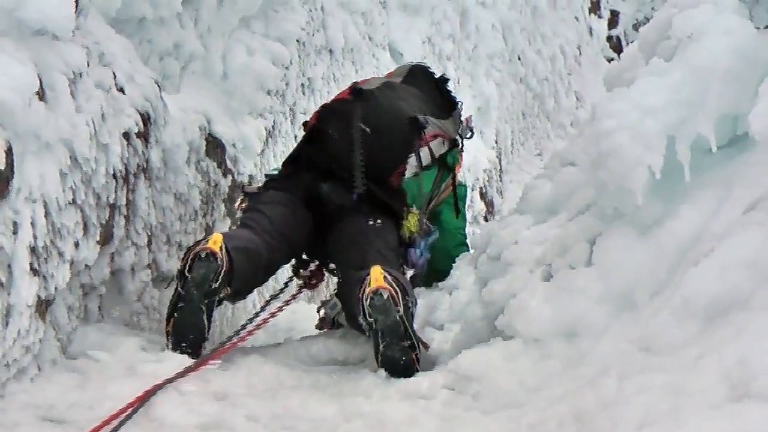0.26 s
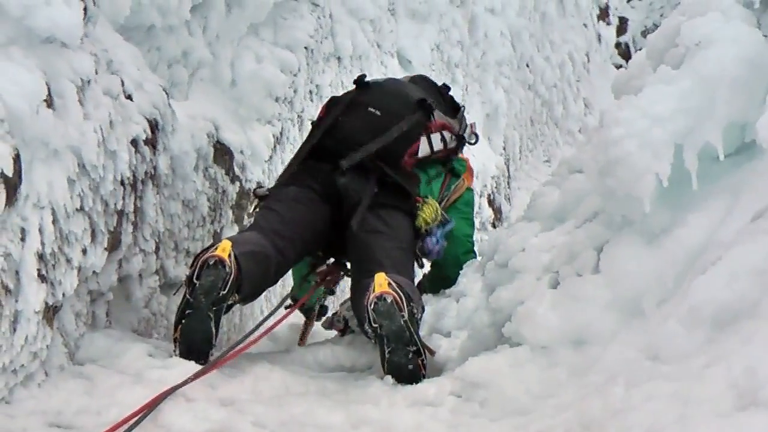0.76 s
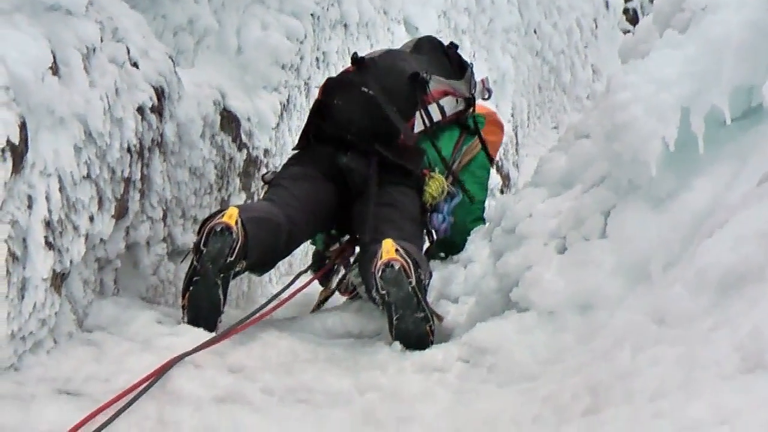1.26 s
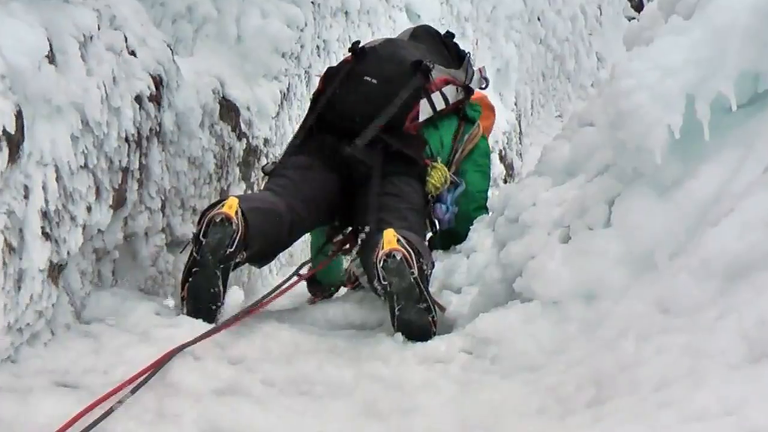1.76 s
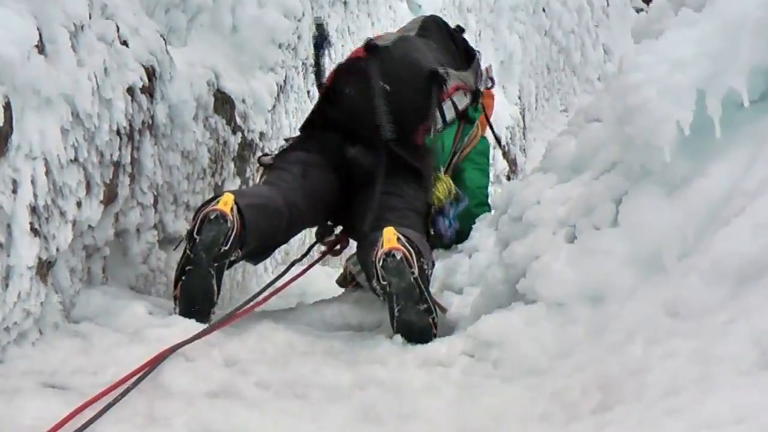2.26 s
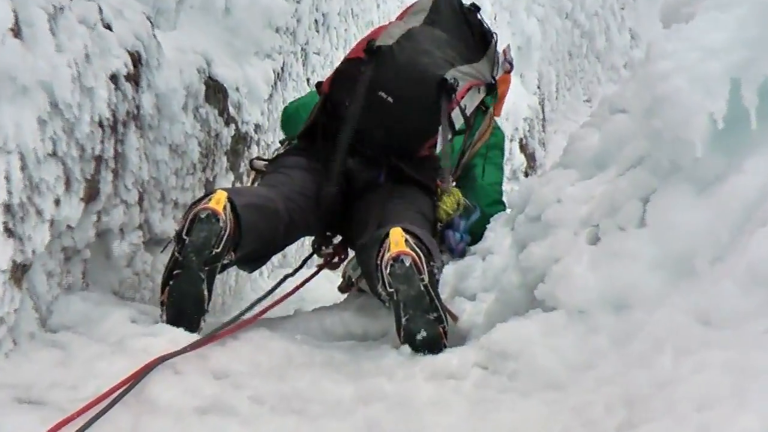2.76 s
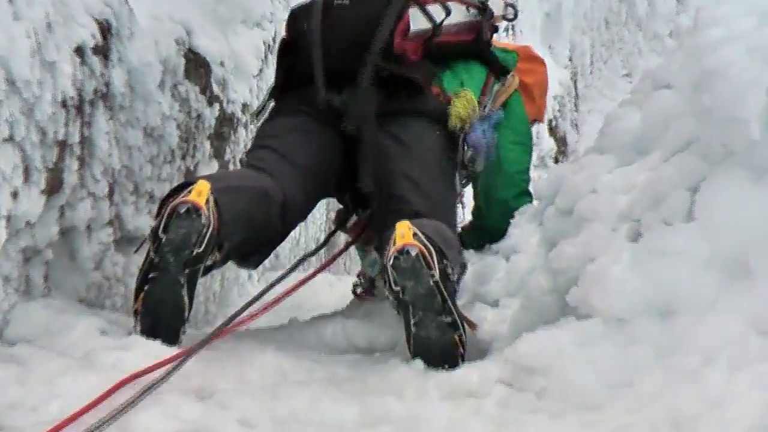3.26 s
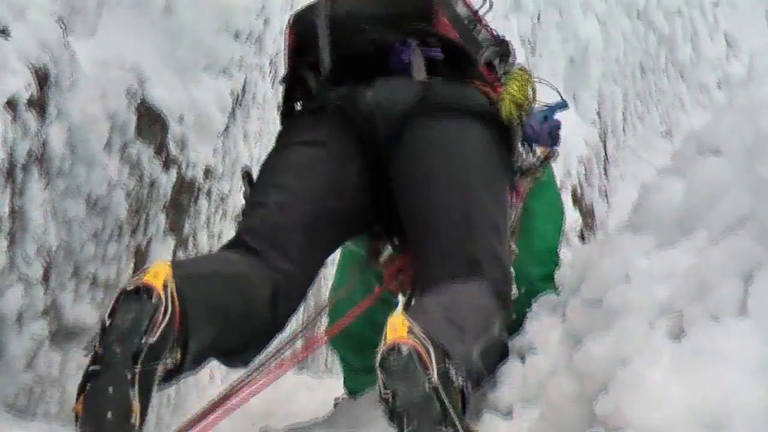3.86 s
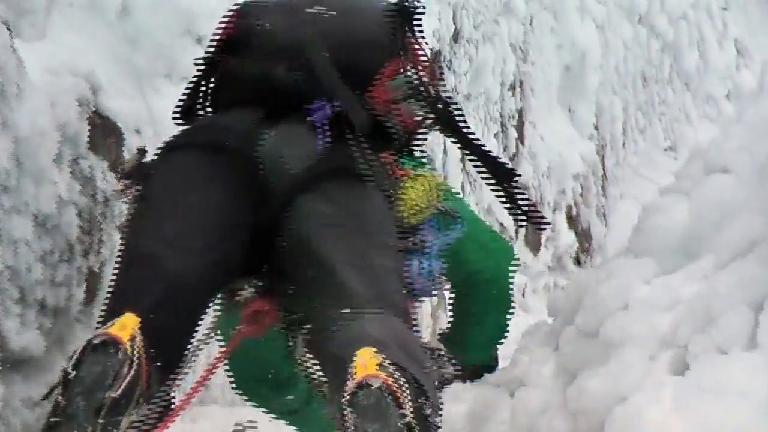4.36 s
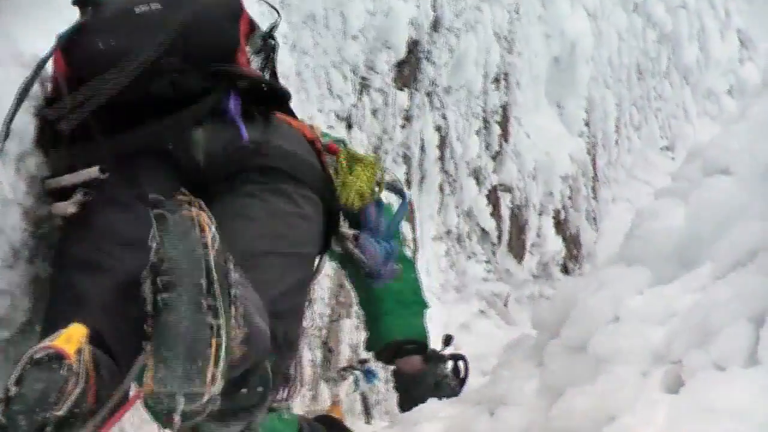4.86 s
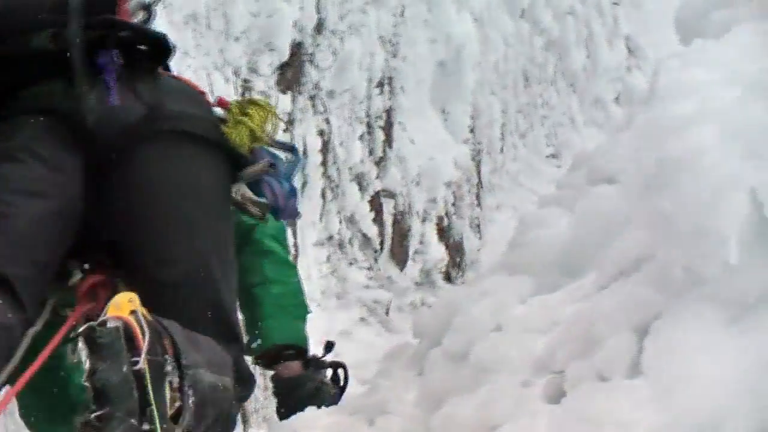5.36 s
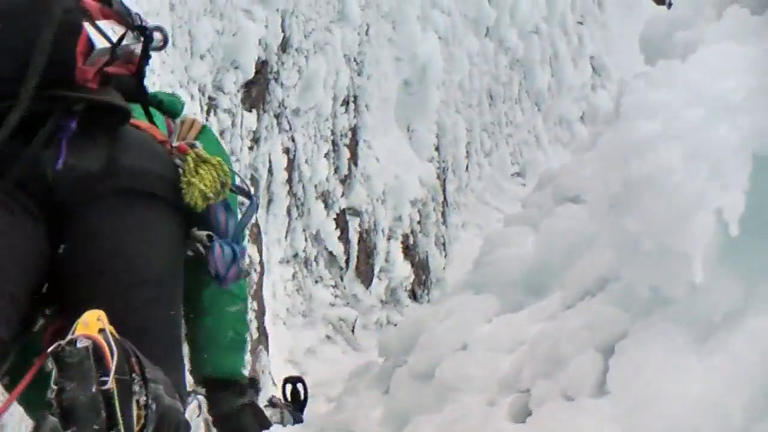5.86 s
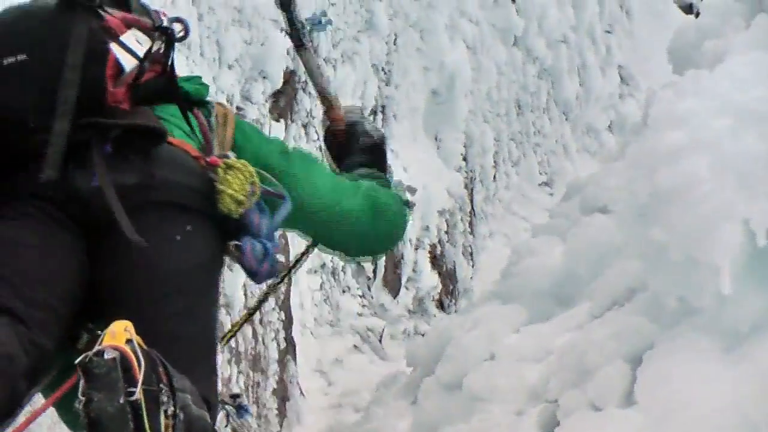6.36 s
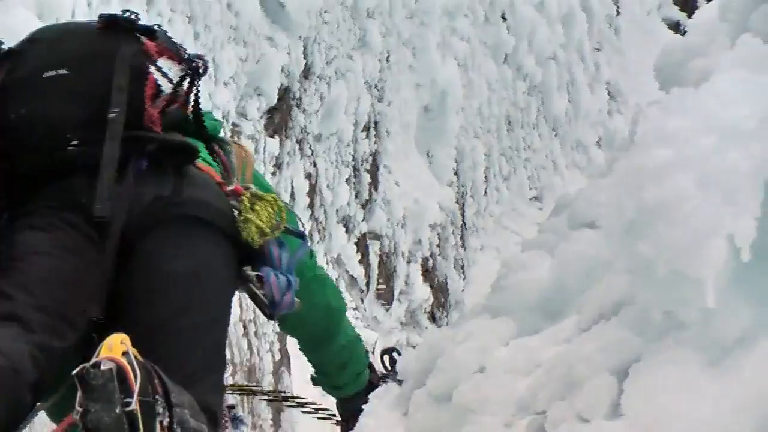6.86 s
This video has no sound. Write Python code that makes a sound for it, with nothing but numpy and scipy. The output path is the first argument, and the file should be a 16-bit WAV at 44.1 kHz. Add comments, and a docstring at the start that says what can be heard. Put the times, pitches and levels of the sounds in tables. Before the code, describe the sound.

Crampons and an ice axe bite snow and ice in irregular snaps and thumps, with small metallic clinks and trickling crumbs.

```python
"""A frozen gully, where a climber moves up on crampons and ice axes, close by.
Points crack the ice: a snap, splintering noise and a short ring. Boots thud (damped, gritty swings)
and crunch (bursts of tiny random fractures), and the metal gear clinks and jangles (dying tones).
Rubbing, trickling snow and ice crumbs follow the climber's effort, over a faint hush of filtered
noise with one puff of wind. Short echoes return from the walls, and the blows drift leftwards."""
import sys
import numpy as np
from scipy import signal
from scipy.fft import rfft, irfft
from scipy.io import wavfile

SR = 44100
rng = np.random.default_rng(int(sys.argv[2]) if len(sys.argv) > 2 else 0)


def file_out(sig):
    """Save sig as 16-bit WAV at sys.argv[1]."""
    # one column per channel
    cols = np.atleast_2d(sig).T
    # limit, then scale
    lim = np.clip(cols, -1, 1)
    pcm = np.round(lim * 32767).astype(np.int16)
    wavfile.write(sys.argv[1], SR, pcm)


N = 313551  # length in samples

# Levels of single sounds hold before the echoes and the stereo placing.
# low hush of the gully, drawn as a spectrum: pitch_hz, level_db
HUSH_SPECTRUM = [(20, -32), (45, -8), (72, -2), (100, -5.5), (200, -5.5), (500, -18), (1500, -25),
                 (6000, -36)]
# how hard the climber moves; rubbing, trickling and jangling follow it: time_s, effort_db
EFFORT_CURVE = [(0.0, -47.5), (0.51, -40.5), (0.77, -49), (1.74, -53.5), (2.02, -55), (3.21, -48),
                (3.34, -47), (4.08, -46.5), (4.57, -42.5), (4.87, -46.5), (5.27, -43), (5.47, -43),
                (5.88, -46), (6.52, -45), (6.67, -47.5), (6.75, -44), (6.95, -44.5), (7.11, -46)]
# a boot drags over the snow: middle_s, half_length_s, level_db
BOOT_DRAGS = [(.42, .11, -44), (4.35, 0.09, -44.5), (5.427, 0.091, -41.5)]
# colour of the rubbing: pitch_hz, level_db
RUB_SPECTRUM = [(59, -50), (100, -7), (195, -2), (356, -5), (394, -5), (456, -8.5), (505, -5), (566, -4.5),
                (1500, -13.5), (1950, -45), (3300, -120)]
# colour of the trickling grains: pitch_hz, level_db
TRICKLE_SPECTRUM = [(400, 12), (900, 6), (1800, 7), (3200, 8), (4500, 0.5), (5600, 4), (6800, -12),
                    (10000, -37)]
# colour of the fine powder: pitch_hz, level_db
POWDER_SPECTRUM = [(3000, -72), (6000, -28), (7500, 1.5), (9500, 11), (10800, 10.5), (12000, 1),
                   (13800, 11), (15000, -26), (16000, -12)]
# what the metal gear rings with: pitch_multiple (no unit), level_db, decay_s
GEAR_MODES = [(.79, -15, 0.0034), (0.918, -5.5, 0.0065), (1., -2.5, 0.0043), (1.089, -2.5, 0.0041),
              (1.352, -11, 0.0092), (2.12, -13, 0.0044), (3.15, -13, 0.0071)]
# pieces of gear knocking together, plus one bright ringing zip at 3.19 s: start_s, peak_level_db, pitch_hz
GEAR_CLINKS = [(.36, -27.5, 4270), (2.336, -38, 4270), (2.3682, -29, 4070), (2.4194, -34, 4270),
               (3.19, -26, 7700), (3.858, -23, 4260), (3.87, -27, 4500), (4.1454, -28.5, 4090),
               (4.456, -29, 4210), (4.483, -27, 3350), (4.5105, -17, 3890), (4.552, -34, 3820),
               (4.605, -29, 3400), (5.166, -20.5, 4230), (5.2306, -24.5, 4500), (5.473, -26.5, 3820),
               (7.033, -29, 4030)]
# snow crushed or showering: start_s, level_db (average over three lengths), length_s, grain_pitch_hz
SNOW_CRUNCHES = [(.438, -40, .02, 900), (0.494, -39, .022, 850), (2.898, -36.5, 0.026, 1050),
                 (2.959, -50, .025, 950), (3.182, -42, 0.025, 2300), (4.327, -35.5, 0.021, 1510),
                 (4.533, -45, 0.018, 900), (4.56, -46, 0.029, 845), (4.598, -38.5, 0.029, 6000),
                 (4.634, -37, 0.011, 5440), (4.752, -39, 0.019, 1700), (4.878, -45, 0.037, 940),
                 (5.011, -45, 0.077, 1440), (5.088, -36.5, 0.018, 1260), (5.116, -43, .05, 1570),
                 (5.242, -33, 0.016, 1650), (5.249, -35.5, 0.013, 1130), (5.34, -46, 0.039, 1470),
                 (5.503, -42, 0.011, 2080), (6.52, -43.5, 0.0039, 600), (6.615, -35, 0.012, 1440),
                 (6.643, -44, 0.046, 1410), (6.723, -39.5, 0.0086, 1420), (6.855, -43, 0.0096, 1580),
                 (6.876, -34, 0.011, 1880)]
# dull blows in packed snow: start_s, level_db, pitch_hz
SNOW_THUDS = [(0.3393, -15, 506), (.348, -25, 600), (0.454, -29.5, 173), (0.516, -30, 167),
              (.566, -38, 417), (1.132, -36.5, 330), (1.2564, -29, 594), (1.415, -33.5, 400),
              (1.648, -28.5, 277), (1.798, -41, 1090), (1.934, -35, 676), (2.004, -40.5, 950),
              (2.7275, -20.5, 196), (2.8959, -16.5, 510), (2.9035, -12.5, 240), (3.136, -26, 256.5),
              (3.189, -24, 510), (3.1955, -24, 174), (3.669, -31.5, 400), (4.339, -18.5, 365),
              (4.343, -27, 180), (4.394, -32, 400), (4.585, -28, 220), (4.686, -31, 330),
              (4.8806, -22.5, 520), (4.922, -26, 228), (5.012, -25.5, 479), (5.097, -20.5, 620),
              (5.253, -12.5, 211), (5.263, -13, 385), (5.274, -13, 213), (5.347, -20.5, 298),
              (5.388, -29, 340), (5.4468, -20.5, 375), (5.507, -21.5, 300), (6.047, -24.5, 890),
              (6.2202, -17, 860), (6.387, -34, 710), (6.5258, -21.5, 320), (6.6332, -22, 575),
              (6.644, -18.5, 744), (6.843, -26.5, 446)]
# what a chip of ice rings with: multiple_of_low_edge (no unit), level_db, decay_s
ICE_MODES = [(1.04, 7.5, 0.004), (1.48, 5, 0.0035), (2.1, 9, 0.0029), (2.65, 5, 0.00085)]
# points cracking the ice: start_s, level_db (average over 50 ms), low_edge_hz, high_edge_hz,
# tick_db (the part of the blow that skips the high edge)
ICE_CRACKS = [(.073, -37, 1530, 2200, -19.5), (0.39, -45, 597, 2750, -6), (0.3976, -42.5, 660, 3040, -25),
              (.4263, -39, 470, 1540, -24), (0.5661, -41.5, 326, 1880, -36),
              (0.597, -32.5, 1546, 3800, -19.5), (1.0346, -48.5, 280, 2310, -38),
              (1.072, -52.5, 280, 1000, -11), (1.1354, -36, 270, 4070, -21),
              (1.2412, -42.5, 900, 1200, -13), (1.2662, -46, 278, 5130, -27),
              (1.327, -32.5, 1073, 7200, -9.5), (1.4146, -46, 283, 1660, -19),
              (1.5408, -44.5, 384, 5170, -15), (1.5681, -28.5, 1232, 3730, -16.5),
              (1.629, -42, 546, 3480, -23), (1.6594, -38, 388, 9600, -35), (1.781, -44.5, 1300, 4500, -16),
              (1.971, -42, 1890, 4100, -12), (2.068, -47.5, 750, 8750, -26),
              (2.1085, -42.5, 2030, 5600, -9), (2.221, -49, 520, 1130, -9), (2.2986, -46, 345, 6660, -13),
              (2.3351, -44, 314, 8800, -25), (2.7285, -34, 294, 3530, -22), (2.7923, -49, 2620, 3240, -22),
              (2.8853, -51.5, 584, 3680, -18), (2.9069, -33, 280, 3470, -21),
              (2.931, -33.5, 2420, 3250, -19), (3.3186, -46.5, 476, 4360, -30),
              (3.3293, -46, 278, 2540, -32), (3.4339, -42, 3500, 4330, -37), (3.4728, -40, 2650, 3850, -11),
              (3.48, -45, 2500, 9000, -10), (3.566, -47, 280, 3000, -13), (3.9102, -46, 313, 1230, -37),
              (3.9515, -50.5, 310, 6910, -20), (3.9913, -44.5, 278, 10100, -36),
              (4.0108, -48, 550, 5240, -5), (4.0334, -46.5, 274, 12000, -25), (4.071, -45, 1470, 3000, -23),
              (4.6827, -41.5, 270, 1370, -23), (5.0122, -27, 390, 4850, -15),
              (5.047, -39.5, 690, 3480, -25), (5.2737, -27.5, 278, 1450, -30),
              (5.9482, -25.5, 1138, 4870, -17), (6.048, -29.5, 520, 2500, -49),
              (6.094, -45, 980, 2270, -38), (6.148, -39, 1470, 4530, -21), (6.1614, -43, 392, 3980, -18),
              (6.1858, -27.5, 2550, 3070, -26), (6.2178, -29.5, 700, 3620, -25),
              (6.39, -41.5, 444, 1580, -22), (6.4546, -38.5, 497, 12900, -39),
              (6.4718, -41.5, 1500, 7000, -13), (6.5518, -30.5, 1520, 2840, -21),
              (6.5895, -45.5, 493, 5750, 0), (6.6194, -38.5, 480, 3040, -34),
              (6.633, -27.5, 430, 3520, -16.5), (6.764, -44.5, 278, 4360, -12),
              (6.7798, -40.5, 282, 2300, -20), (6.842, -32.5, 330, 2520, -24), (6.878, -40.5, 282, 4830, 7),
              (6.9265, -42.5, 477, 2090, -11.5)]
# how far left and right differ at each pitch: pitch_hz, side_level_db
SIDE_SPECTRUM = [(60, -33.5), (300, -15), (1500, -49), (3000, -45.5), (5000, -13.5), (7000, -4),
                 (9000, -4.5), (11500, -26), (15000, -9)]

# one puff of wind: peak time and level, then how fast it swells and dies away
GUST_S, GUST_DB, GUST_RISE_DB_PER_S, GUST_FALL_DB_PER_S = 6.83, -43.5, 65, 56
USUAL_EFFORT_DB = -46  # at this effort the following layers have their plain level
# the gear swings more during the high step: middle, half length, extra level
STEP_S, STEP_HALF_S, STEP_SWING_DB = 4.5, .9, 8.5
# stray flakes: level against the climber's effort, and the range of their low edges
FLAKE_DB, FLAKE_LOW_HZ, FLAKE_HIGH_HZ = -5.5, 300, 2200
GRAIN_RANGE = 2.86  # crunching grains sound from this factor below their pitch to this factor above
# a thud at THUD_HZ has decay THUD_S; deeper ones move more snow and last longer
THUD_S, THUD_HZ, DEEP_LINGER = 0.0037, 400, 0.14
# splintering has decay SPLINTER_S for a firm blow; weaker blows crumble a little longer
SPLINTER_S, FIRM_DB, CRUMBLE_PER_DB = .002, -27, .008
# the climber drifts leftwards: left minus right at the start, and its growth
LEFT_DB, LEFT_DB_PER_S = .6, .3
TOP_HZ = 15300  # upper limit of the whole sound


def amp(db):
    """Turns decibels into a plain multiplier."""
    return 10 ** (np.asarray(db) / 20)


def unit(x):
    """Scales a sound to an average (rms) level of one."""
    return x / np.sqrt(np.mean(x ** 2) + 1e-20)


def add(mix, start_s, sound):
    """Adds a sound into the mix at its start time, cut off at the end of the mix."""
    part = mix[max(round(start_s * SR), 0):][:len(sound)]
    part += sound[:len(part)]


def clock():
    """Time of every sample in seconds."""
    return np.arange(N) / SR


def swell(middle_s, half_s):
    """A smooth rise and fall around one moment."""
    return np.exp(-((clock() - middle_s) / half_s) ** 2)


def effort(follow):
    """Loudness of a layer that follows the climber's effort by so many dB per dB."""
    effort_db = np.interp(clock(), *np.transpose(EFFORT_CURVE))
    return amp(follow * (effort_db - USUAL_EFFORT_DB))


def colour(x, points):
    """Filters by a spectrum drawn between points on a logarithmic pitch axis."""
    hz, db = np.transpose(points)
    f = np.fft.rfftfreq(len(x), 1 / SR)
    gain = amp(np.interp(np.log(f + 1), np.log(hz), db))
    return irfft(rfft(x) * gain, len(x))


def edge(x, hz, kind, order):
    """Removes what lies above ("low") or below ("high") a pitch, without looking ahead in time."""
    safe_hz = np.clip(hz, 20, .45 * SR)
    return signal.sosfilt(signal.butter(order, safe_hz, kind, fs=SR, output="sos"), x)


def ring(t, hz, modes, scatter):
    """A struck piece rings with several dying tones, a little different at every blow."""
    detune = 1 + scatter * rng.uniform(-1.06, 1, len(modes))
    sound = np.zeros(len(t))
    for (multiple, db, decay_s), shift in zip(modes, detune):
        tone = np.sin(2 * np.pi * min(hz * multiple * shift, SR / 2) * t)
        sound += rng.choice([-1, 1]) * amp(db) * np.exp(-t / decay_s) * tone
    return sound


def grains(count, per_s, spread_db):
    """Tiny fractures at random moments, mostly small and a few large."""
    out = np.zeros(count)
    at = np.flatnonzero(rng.random(count) < per_s / SR)
    chance, sign = rng.random((len(at), 2)).T
    size = np.minimum(-np.log(1 - chance), 4)
    out[at] = np.sign(sign - .5) * amp(spread_db * size)
    return out


def air(hush_db=-60, buffet_db=4, buffet_hz=14):
    """Moving air is filtered noise: a low steady hush and one deep, lumpy puff of wind."""
    puff = edge(edge(rng.standard_normal(N), 103, "low", order=3), 55, "high", order=2)
    puff *= amp(buffet_db * unit(edge(rng.standard_normal(N), buffet_hz, "low", order=2)))
    since = clock() - GUST_S
    gust = amp(GUST_DB + np.minimum(GUST_RISE_DB_PER_S * since, -GUST_FALL_DB_PER_S * since))
    hush = unit(colour(rng.standard_normal(N), HUSH_SPECTRUM))
    return amp(hush_db) * hush + gust * unit(puff)


def crystals(per_s=200, cycles=2, spread_db=4.5):
    """Snow grains of many sizes break; each gives a blip a few cycles long at its own pitch."""
    out = np.zeros(N)
    for hz in np.geomspace(450, 14500, 22):
        r, turn = np.exp(-hz / (cycles * SR)), 2 * np.pi * hz / SR
        resonance = [1, -2 * r * np.cos(turn), r * r]
        blips = signal.lfilter([1, 0, -1], resonance, grains(N, per_s, spread_db))
        out += np.sqrt(hz) * unit(blips)
    return unit(out)


def loose_snow(rub_db=-51.0, trickle_db=-50.0, powder_db=-55.5,
               rub_follow=.65, trickle_follow=1.14, powder_follow=0.93):
    """Rubbing, trickling grains and powder are noise and blips that arrive in shared little clumps."""
    clumps = amp(2.4 * unit(edge(rng.standard_normal(N), 40, "low", order=2)))
    rub = unit(colour(clumps * rng.standard_normal(N), RUB_SPECTRUM))
    crackle = clumps * (crystals() + .5 * rng.standard_normal(N))  # the finest grains merge into hiss
    trickle = unit(colour(crackle, TRICKLE_SPECTRUM))
    powder = unit(colour(crackle, POWDER_SPECTRUM))
    dragging = sum(amp(db) * swell(middle_s, half_s) for middle_s, half_s, db in BOOT_DRAGS)
    rub_level = np.hypot(amp(rub_db) * effort(rub_follow), dragging)
    return (rub_level * rub
            + amp(trickle_db) * effort(trickle_follow) * trickle
            + amp(powder_db) * effort(powder_follow) * powder)


def crumbs(level_db=-55, per_s=8, follow=0.53):
    """Small crumbs of ice patter on the slope: short noise taps, each size in its own pitch band."""
    out, t = np.zeros(N), np.arange(SR // 50) / SR
    for hz in np.geomspace(600, 5000, 12):
        tap = rng.standard_normal(len(t)) * np.exp(-t / .0018)
        tap = unit(edge(edge(tap, hz, "high", order=2), 2 * hz, "low", order=2))
        out += signal.oaconvolve(grains(N, per_s, spread_db=8.5), tap)[:N]
    return amp(level_db) * effort(follow) * unit(out)


def jangle(level_db=-59, follow=0.23, per_s=22, damping=0.57):
    """Gear brushes lightly as the harness sways; pieces lying together ring only briefly."""
    t = np.arange(SR // 40) / SR
    modes = [(multiple, db, damping * decay_s) for multiple, db, decay_s in GEAR_MODES]
    pieces = np.zeros(N)
    for hz in np.geomspace(3500, 4900, 10):
        touches = grains(N, per_s, spread_db=5.5)
        pieces += signal.oaconvolve(touches, ring(t, hz, modes, scatter=0.0446))[:N]
    level = amp(level_db + STEP_SWING_DB * swell(STEP_S, STEP_HALF_S))
    return level * effort(follow) * unit(pieces)


def chip(db, low_hz, high_hz, tick_db, ring_db=-4, body_db=-31, snap_db=-4, rise_share=.09):
    """A snap and fast-dying splintering; the size of the piece sets its band and its ring."""
    t = np.arange(SR // 20) / SR
    decay_s = SPLINTER_S * np.exp(CRUMBLE_PER_DB * (FIRM_DB - db))
    shape = np.exp(-t / decay_s) * (1 - np.exp(-t / (rise_share * decay_s)))
    splinters = unit(rng.standard_normal(len(t)) * shape)
    force = splinters + amp(snap_db) * unit(1. * (t == 0))  # the snap is a single-sample click
    crack = edge(force, high_hz, "low", order=4) + amp(tick_db) * force
    body = edge(crack, 240, "high", order=2)
    crack = unit(edge(crack, low_hz, "high", order=3) + amp(body_db) * body)
    hardness = low_hz / (low_hz + 400)  # small hard pieces ring, big snowy ones hardly do
    tone = hardness * amp(ring_db) * unit(ring(t, low_hz, ICE_MODES, scatter=0.055))
    return amp(db) * unit(crack + tone)


def flakes(count=24, spread_db=2, width=3, tick_db=-20):
    """Faint stray flakes break off by chance, one per equal slice of time, louder with more effort."""
    out = np.zeros(N)
    for k, (when, size, strength) in enumerate(rng.random((count, 3))):
        start_s = (k + when) / count * N / SR
        hz = FLAKE_LOW_HZ * (FLAKE_HIGH_HZ / FLAKE_LOW_HZ) ** size
        effort_db = np.interp(start_s, *np.transpose(EFFORT_CURVE))
        db = effort_db + FLAKE_DB + spread_db * (2 * strength - 1)
        add(out, start_s, chip(db, hz, width * hz, tick_db))
    return out


def clinks(tick_db=-12, tick_s=.0035):
    """Metal clips and screws touch with a tick and a ring; slings and cloth damp them quickly."""
    out, t = np.zeros(N), np.arange(SR // 8) / SR
    for start_s, db, hz in GEAR_CLINKS:
        tick = edge(rng.standard_normal(len(t)) * np.exp(-t / tick_s), 2400, "high", order=2)
        sound = ring(t, hz, GEAR_MODES, scatter=0.024) + amp(tick_db) * tick
        add(out, start_s, amp(db) * sound / abs(sound).max())
    return out


def crunches(fizz_db=-20, body_db=-17, lumpy_db=3.5):
    """A clump of breaking snow crystals swells fast and crumbles away in fits."""
    out = np.zeros(N)
    for start_s, db, length_s, hz in SNOW_CRUNCHES:
        u = np.arange(int(3 * length_s * SR)) / (length_s * SR)  # time counted in lengths
        fits = amp(lumpy_db * unit(edge(rng.standard_normal(len(u)), 145, "low", order=2)))
        shape = u ** 0.32 * np.exp(-(u / 0.8) ** 2)
        burst = fits * grains(len(u), per_s=2400, spread_db=1.0) * shape
        burst = edge(burst, hz * GRAIN_RANGE, "low", order=3) + amp(fizz_db) * burst
        body = edge(burst, 310, "high", order=2)
        burst = edge(burst, hz / GRAIN_RANGE, "high", order=2) + amp(body_db) * body
        add(out, start_s, amp(db) * unit(burst))
    return out


def thuds(rise_s=0.0005, cut_hz=105):
    """Packed snow gives way: a heavily damped, gritty swing that slows as the snow yields."""
    out, t = np.zeros(N), np.arange(SR // 10) / SR
    for start_s, db, hz in SNOW_THUDS:
        decay_s = THUD_S * (THUD_HZ / hz) ** DEEP_LINGER
        grit = edge(rng.standard_normal(len(t)), 2 * hz, "low", order=2)
        grit = unit(edge(grit, hz / 2, "high", order=2))
        falling_hz = hz * (.88 + .24 * np.exp(-t / decay_s))
        swing = np.sin(2 * np.pi * np.cumsum(falling_hz) / SR)
        shape = (1 - np.exp(-t / rise_s)) * np.exp(-t / decay_s)
        add(out, start_s, amp(db) * shape / shape.max() * unit(swing + grit / 2) / np.sqrt(2))
    return edge(out, cut_hz, "high", order=2)


def chips():
    """Axe picks and crampon points crack the ice, one chip per blow."""
    out = np.zeros(N)
    for start_s, *blow in ICE_CRACKS:
        add(out, start_s, chip(*blow))
    return out


def gully(x, wet_db=-17, decay_s=0.0053):
    """Snow swallows sound: only a brief, faint scatter returns from the ice walls."""
    t = np.arange(SR // 6) / SR
    tail = rng.standard_normal(len(t)) * np.exp(-t / decay_s) * (t > .004)  # first return after 4 ms
    tail = edge(tail, 13500, "low", order=1)
    return x + amp(wet_db) * signal.oaconvolve(x, tail / np.linalg.norm(tail))[:N]


def scene(smear_s=0.0019, air_apart_db=-6, around_share=0.34):
    """Blows sit a little to the left; smeared sound and separate air make left and right differ."""
    around = air() + loose_snow() + crumbs() + jangle()
    blows = gully(flakes() + clinks() + crunches() + thuds() + chips())
    t = np.arange(SR // 200) / SR
    scatter = rng.standard_normal(len(t)) * np.exp(-t / smear_s)
    smeared = signal.oaconvolve(blows + around, scatter / np.linalg.norm(scatter))[:N]
    side = colour(smeared, SIDE_SPECTRUM)  # added on the left, subtracted on the right
    side += amp(air_apart_db) * edge(air(), 44, "low", order=1)
    lean = amp((LEFT_DB + LEFT_DB_PER_S * clock()) / 2)  # half the difference goes to each side
    slight = lean ** around_share
    left = blows * lean + around * slight + side
    right = blows / lean + around / slight - side
    return np.array([left, right])


def record(dry):
    """Removes the treble above the upper limit with a steep filter."""
    lowpass = signal.firwin(255, TOP_HZ, window=("kaiser", 9), fs=SR)
    return signal.oaconvolve(dry, lowpass[None], "same")


dry = scene()
out = record(dry)
file_out(out)
```